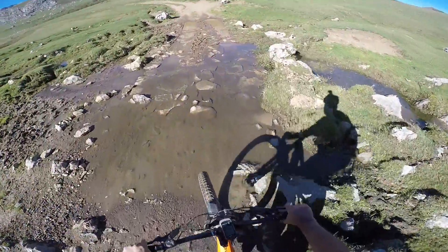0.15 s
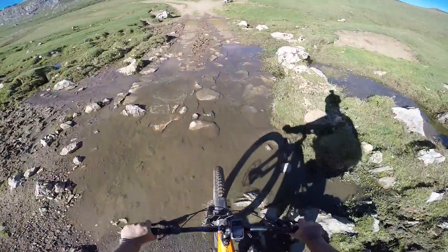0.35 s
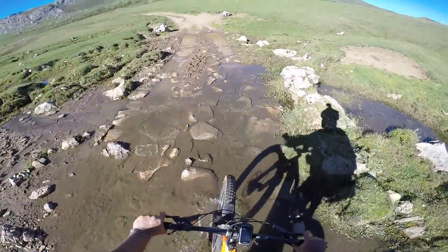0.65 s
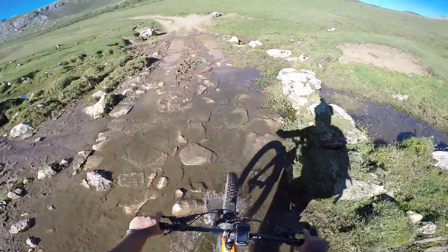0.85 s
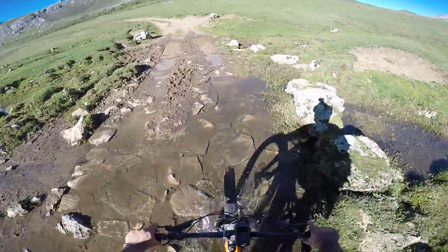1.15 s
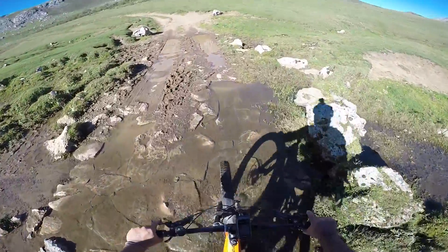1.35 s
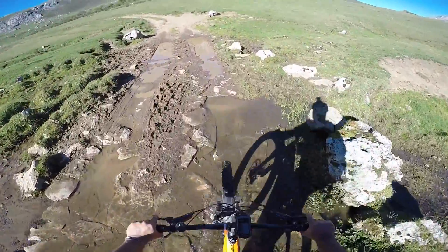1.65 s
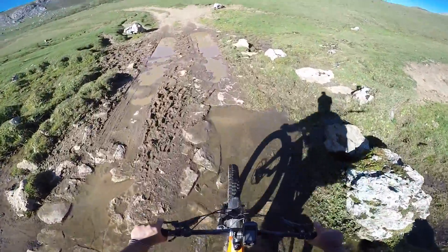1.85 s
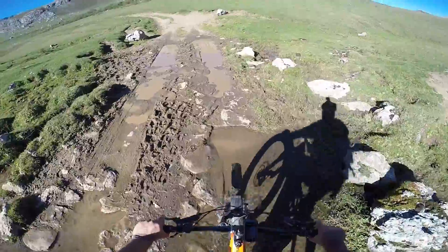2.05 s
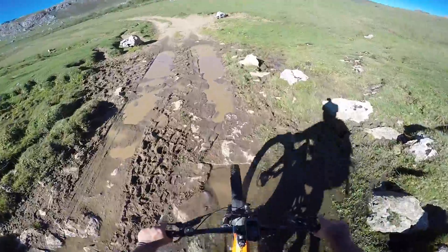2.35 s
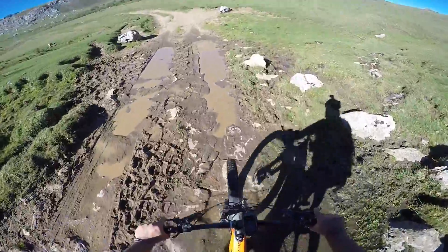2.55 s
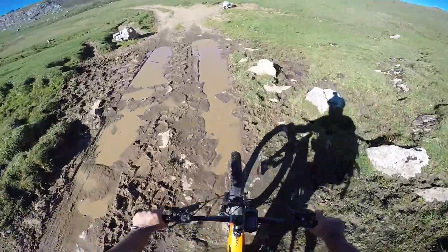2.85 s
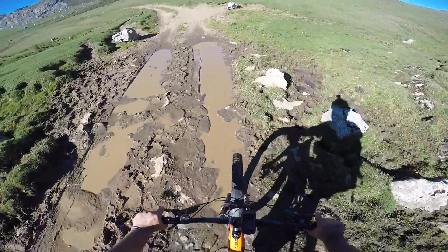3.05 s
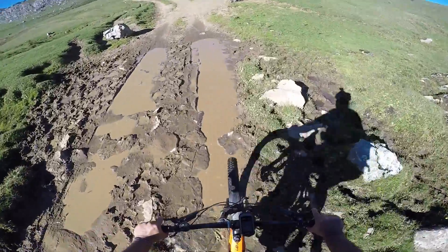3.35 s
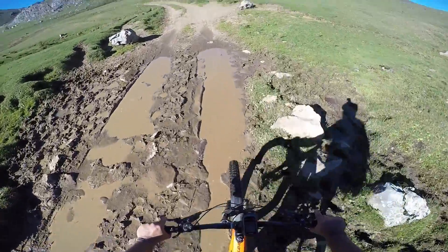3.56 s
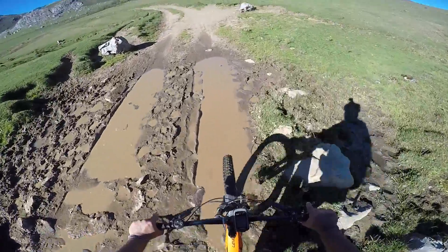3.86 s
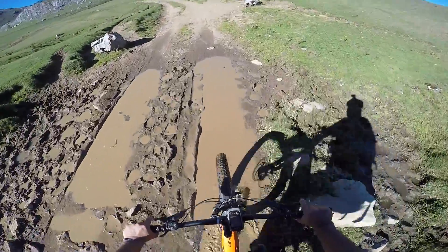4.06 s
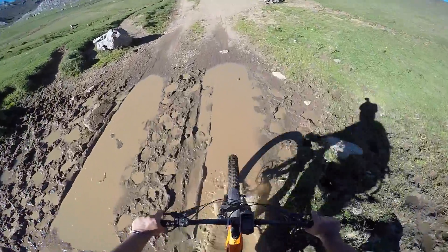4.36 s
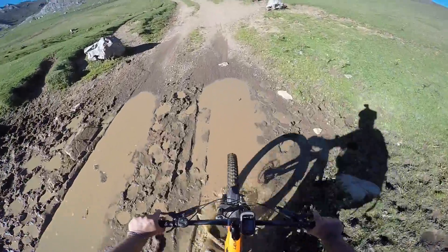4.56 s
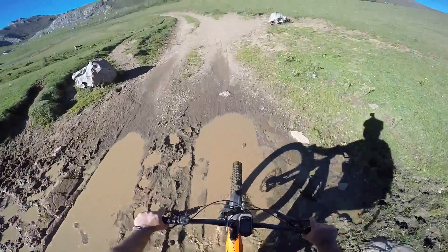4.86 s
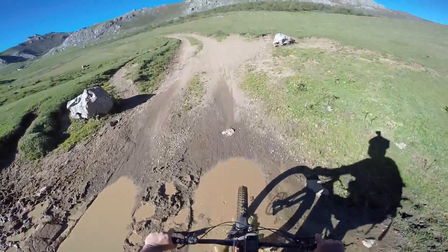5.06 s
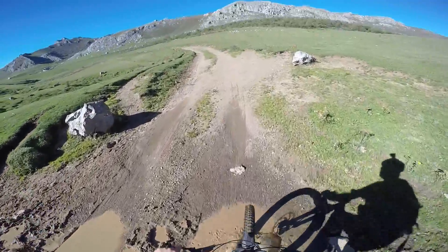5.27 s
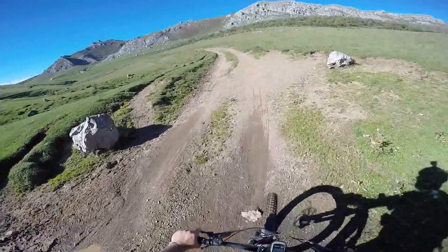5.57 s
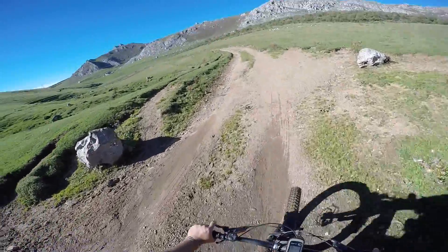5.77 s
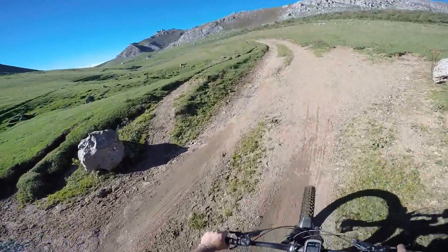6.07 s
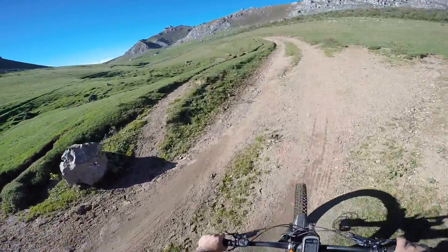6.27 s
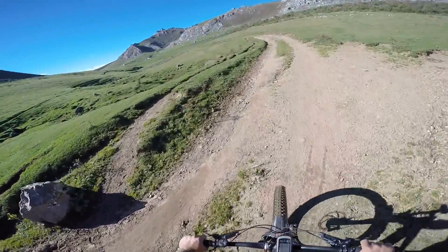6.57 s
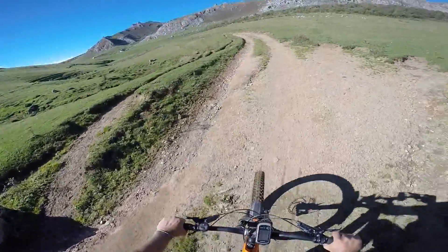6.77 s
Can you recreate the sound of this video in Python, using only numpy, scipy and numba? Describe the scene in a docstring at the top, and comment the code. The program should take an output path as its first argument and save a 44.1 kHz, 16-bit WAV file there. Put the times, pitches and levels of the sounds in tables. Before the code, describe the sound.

A bicycle rolls through puddles and mud, heard close from the rider's head through a boxy, muffled case. Watery rushing surges and flickers, dotted with short splats and a few small bubble plops. Wind thuds and flutters underneath throughout, with a brief sagging low hum midway and blunt knocks afterwards. The splashes thin out near the end, leaving breeze and faint hiss.

```python
"""On a muddy hillside track, a camera in a closed case rides on a cyclist's helmet.
Wind buffets the case: filtered noise rumbles and flutters, low damped rings knock, a brief hum sags.
Tyres throw water from puddles: noise and showers of tiny rings, splats as noise bursts, plops as tones,
with wash and splats coloured by the case's resonances. An insect's pulsed high tone chirps three times
over the microphone's steady hiss."""
import sys
import numpy as np
from scipy import signal
from scipy.fft import rfft, irfft, next_fast_len
from scipy.io import wavfile
from scipy.ndimage import uniform_filter1d
from numba import njit

SR = 44100
rng = np.random.default_rng(int(sys.argv[2]) if len(sys.argv) > 2 else 0)


def master_out(mix):
    """Clip the mix to full scale and print it as 16-bit PCM to the path in sys.argv[1]."""
    frames = np.transpose(np.atleast_2d(mix))
    ceiling = np.clip(frames, -1, 1)
    pcm = np.round(ceiling * 32767).astype(np.int16)
    wavfile.write(sys.argv[1], SR, pcm)


N = 305172

# resonances of the case that colour outside sound: centre_hz, width_hz, boost_db
CASE_RESONANCES = [(1216, 480, 13), (1925, 376, 12), (2350, 275, 9.5), (2840, 70, 7), (3352, 435, 11.5),
                   (4076, 340, 7.5), (4695, 92, 8), (6000, 140, 5), (7180, 1670, 7)]
# spectrum of outside sound at the microphone, before the resonances: frequency_hz, density_db (per Hz)
OUTSIDE_SPECTRUM = [(400, -3.5), (900, -9), (1600, -12.5), (3000, -3), (4500, -9), (5500, -14.5),
                    (8000, -15), (10000, -20.5), (15000, -21.5)]


def undb(db):
    """Amplitude factor for a level in dB."""
    return 10 ** (np.asarray(db) / 20)


def level(x, db):
    """Scales a signal to an RMS level in dB."""
    return x * undb(db) / np.sqrt(np.mean(x ** 2))


def curves(table):
    """Columns of a table joined by straight lines in time."""
    s, *columns = np.transpose(table)
    return [np.interp(np.arange(N) / SR, s, column) for column in columns]


def colour(x, spectrum, peaks=()):
    """Causal filter with the given spectrum plus resonant boosts (phase from the cepstrum)."""
    size = next_fast_len(len(x) + SR)
    hz = np.arange(size // 2 + 1) * SR / size + 1e-3
    point_hz, point_db = np.transpose(spectrum)
    db = np.interp(np.log(hz), np.log(point_hz), point_db)
    for centre, width, boost_db in peaks:
        db = db + boost_db / (1 + (2 * (hz - centre) / width) ** 2)
    # folding the cepstrum onto positive times gives minimum phase
    cepstrum = irfft(db * np.log(10) / 20, size)
    cepstrum[1:size // 2] *= 2
    cepstrum[size // 2 + 1:] = 0
    response = np.exp(rfft(cepstrum))
    return irfft(rfft(x, size) * response, size)[:N]


def band(x, lo_hz, hi_hz, order=3):
    """Butterworth band-pass."""
    return signal.sosfilt(signal.butter(order, [lo_hz, hi_hz], "band", fs=SR, output="sos"), x)


def walk(rate):
    """Random levels held 1 / rate s and slewed twice; spread near 1."""
    hold = int(SR / rate)
    steps = np.repeat(rng.standard_normal(N // hold + 1), hold)
    return 1.3 * uniform_filter1d(uniform_filter1d(steps, hold), hold)[:N]


def steady(x, hold_s, share):
    """Evens out a share of the swells that narrow noise has by itself."""
    power = uniform_filter1d(x ** 2, int(hold_s * SR))
    return level(x / power ** (share / 2), 0)


def swell(s, db, rise_s, fall_s):
    """Power of bell-shaped swells, summed; computed every 64 samples and joined by lines."""
    coarse = np.arange(0, N, 64)
    t = coarse / SR - np.array(s)[:, None]
    bell = np.exp(-(t / np.where(t < 0, rise_s, fall_s)) ** 2)
    power = undb(2 * np.array(db))[:, None] * bell
    return np.interp(np.arange(N), coarse, power.sum(axis=0))


@njit
def rings(start, hz, cycles, glide, size, n):
    """Damped sines, fading by 1/e in the given cycles; a positive glide raises the pitch, as in bubbles."""
    y = np.zeros(n)
    for g in range(len(start)):
        length = cycles[g] * SR / hz[g]
        phase = 0.
        for i in range(min(int(5 * length), n - start[g])):
            phase += 2 * np.pi * hz[g] * (1 + glide * i / length) / SR
            y[start[g] + i] += size[g] * np.exp(-i / length) * np.sin(phase)
    return y


def drops(count, lo_hz, hi_hz, cycles, glide, scatter_db):
    """A random shower of gliding rings whose sizes scatter exponentially in dB."""
    when, pitch, loudness, damping = rng.random((count, 4)).T
    start = (when * N).astype(np.int64)
    hz = lo_hz * (hi_hz / lo_hz) ** pitch
    size = undb(scatter_db * np.minimum(-np.log(1 - loudness), 3))
    return level(rings(start, hz, cycles * (.5 + damping), glide, size, N), 0)


def wind():
    """Turbulence rumbles in the case, split at 45 Hz, and flutters at its edges; buffets swell from a breeze."""
    # wind noise inside the case: frequency_hz, density_db (per Hz)
    rumble = [(3, -12), (8, -2), (16, 2), (22, -3.5), (30, -10), (40, -12), (50, -13), (60, -19.5),
              (80, -30), (100, -38), (140, -48), (250, -90)]
    # steady wind between buffets: start_s, deep_db, upper_db
    breeze = [(0, -37, -54), (.6, -32.5, -44), (1.4, -33.5, -59.5), (2.0, -35, -45.5), (2.7, -28, -52),
              (3.5, -37.5, -49.5), (3.8, -33, -46.5), (5.15, -24, -47.5), (5.4, -34, -61),
              (5.65, -29.5, -48), (6.1, -41, -54), (6.87, -31.5, -59), (6.92, -59, -59)]
    # short swells whose power adds to the breeze: peak_s, deep_db, upper_db
    buffets = [(.44, -27, -46), (.86, -24, -47), (1.25, -26.5, -40), (1.39, -27, -40.5), (1.54, -22, -45),
               (1.64, -38, -38.5), (1.84, -28.5, -65), (2.28, -29, -34), (2.63, -26, -43),
               (2.75, -43, -35.5), (3.09, -30.5, -40), (3.33, -27, -41), (3.665, -25.5, -41),
               (3.715, -19, -40), (3.775, -25.5, -41), (3.94, -22, -52), (4.18, -29, -40.5),
               (4.431, -21, -30), (4.62, -21.5, -45), (5.0, -25, -35), (5.542, -20, -33),
               (5.96, -27.5, -64), (6.24, -27.5, -62), (6.52, -33, -44), (6.84, -37, -41.5)]
    # longer swells of the flutter: peak_s, level_db, half_width_s (to 1/e of the power)
    flutters = [(0.1, -65, 0.16), (1.82, -59.5, 0.14), (3.1, -64, 0.23)]
    rise_s, fall_s = 0.023, 0.03  # upper buffets, to 1/e of the power
    deep_stretch = 1.33  # the deep rumble swells this many times slower
    flutter_floor_db = -71

    deep_calm_db, upper_calm_db = curves(breeze)
    s, deep_db, upper_db = np.transpose(buffets)
    deep_swell = swell(s, deep_db, deep_stretch * rise_s, deep_stretch * fall_s)
    deep_gain = np.sqrt(undb(2 * deep_calm_db) + deep_swell)
    upper_gain = np.sqrt(undb(2 * upper_calm_db) + swell(s, upper_db, rise_s, fall_s))

    air = colour(rng.standard_normal(N + SR), rumble)
    low_air = signal.sosfilt(signal.butter(4, 45, fs=SR, output="sos"), air)
    high_air = signal.sosfilt(signal.butter(4, 45, "high", fs=SR, output="sos"), air)
    deep = steady(low_air, hold_s=0.12, share=0.85)
    upper = steady(high_air, hold_s=0.078, share=0.65)

    flutter = undb(2.5 * walk(15.)) * band(rng.standard_normal(N), 85, 210, order=2)
    s, db, half_s = np.transpose(flutters)
    flutter_swell = swell(s, db, half_s[:, None], half_s[:, None])
    flutter_gain = np.sqrt(undb(2 * flutter_floor_db) + flutter_swell)
    return deep_gain * deep + upper_gain * upper + flutter_gain * level(flutter, 0)


def water():
    """Fizz, droplets and bubbles over rushing noise; the bands surge together and flicker alone."""
    # water thrown by the tyres: start_s, wash_db, spray_db (relative to wash), slosh_db (relative to wash)
    thrown = [(0, -62.5, -1, -2), (.3, -61, 1, -7), (.48, -55, 1.5, -11), (.56, -65, 5, 1.5),
              (.62, -53, 2.5, -12), (.72, -52.5, -3, -12.5), (.84, -54.5, 3.5, -7.5), (1.15, -53, 3, -6.5),
              (1.62, -50.5, -0.5, -7), (1.72, -55.5, -1.5, -7.5), (2.12, -54.5, 1.5, -6.5),
              (2.24, -56.5, 1, -11), (2.72, -55, 0, -5), (2.85, -63.5, -2, 2), (3.12, -58.5, 0.5, -2.5),
              (3.45, -63, 0, -7.5), (3.62, -60.5, 4.5, -9), (3.71, -63, 1.5, -8), (3.8, -58.5, 3.5, -9.5),
              (4.3, -53.5, 1.5, -10.5), (4.7, -52, 2, -8.5), (4.97, -53.5, 0.5, -6.5),
              (5.25, -49.5, -1.5, -12.5), (5.6, -52, -2, -8.5), (6.0, -54, -4.5, -9.5),
              (6.35, -66, -1.5, -9.5), (6.92, -73.5, -0.5, -1)]
    wash_db, spray_db, slosh_db = curves(thrown)
    # fine mist, relative to the wash: follows the spray and lags behind a louder wash
    mist_db = -13 + 1.3 * spray_db - 0.18 * (wash_db + 56)

    fizz = drops(count=7000, lo_hz=886.0, hi_hz=12800.0, cycles=0.85, glide=0.1, scatter_db=-3.5)
    droplets = drops(count=2500, lo_hz=1488.0, hi_hz=7520.0, cycles=3.16, glide=0.046, scatter_db=2.0)
    bubbles = drops(count=900, lo_hz=1700., hi_hz=6000., cycles=10., glide=0.02, scatter_db=2.)
    # low rings last longer, so the treble of the showers is lifted to even them out
    shower = level(np.diff(fizz + undb(-1.) * droplets, prepend=0), -2.5)
    rush = rng.standard_normal(N)
    heard = colour(rush + shower + undb(-12.) * bubbles, OUTSIDE_SPECTRUM, CASE_RESONANCES)

    # shared surge and separate flicker, both in dB
    surge = .5 * walk(40.) + 1.0 * walk(80.)
    wash = undb(surge + 0.5 * walk(30.)) * band(heard, 1600, 3227)
    slosh = undb(1.76 * surge + 0.51 * walk(30.)) * band(heard, 517, 1547)
    spray = undb(surge + 1.0 * walk(30.)) * band(heard, 2900, 5000)
    mist = undb(.9 * surge + 1.6 * walk(30.)) * band(heard, 5300, 14500)
    mix = level(wash, 0)
    mix = mix + undb(slosh_db) * level(slosh, 0)
    mix = mix + undb(spray_db) * level(spray, 0)
    mix = mix + undb(mist_db) * level(mist, 0)
    return undb(wash_db) * mix


def hiss():
    """The microphone's own noise: steady, shaped noise with narrow raised bands."""
    # noise floor: frequency_hz, density_db (per Hz, relative)
    hiss_spectrum = [(90, -4.5), (250, -11.5), (350, -15), (600, -17.5), (1300, -20), (1600, -22.5),
                     (2000, -16), (7500, -32), (9400, -31.5), (13500, -36), (15200, -41)]
    # raised bands in the noise floor: centre_hz, width_hz, boost_db
    hiss_bands = [(250, 60, 4), (9500, 200, 9.5), (14300, 300, 6)]
    return level(colour(rng.standard_normal(N), hiss_spectrum, hiss_bands), -59.5)


def insect():
    """Each chirp is three fading bell-shaped pulses on one high pitch."""
    # chirps: first_pulse_s, peak_db, pitch_hz
    chirps = [(0.036, -52.5, 9040), (.225, -53.5, 9080), (.407, -59, 9040)]
    spacing_s, half_s = 0.0089, 0.0033
    t, out = np.arange(N) / SR, 0
    for s, db, hz in chirps:
        pulses = 0
        for k in range(3):
            pulses = pulses + undb(-1.8 * k * k) * np.exp(-((t - s - spacing_s * k) / half_s) ** 2)
        out = out + undb(db) * pulses * np.sin(2 * np.pi * hz * t)
    return out


def splats():
    """Mud and water strike as noise bursts in the case's colour, each in its own band and opened by a tick."""
    # single splats: peak_s, level_db (RMS with the envelope's own RMS divided out), lo_hz, hi_hz, t60_s
    splat_table = [(0.410, -50, 2820, 3840, 0.11), (0.677, -50, 2370, 4260, 0.086),
                   (0.945, -46, 1600, 2640, 0.06), (1.043, -45.5, 1820, 2320, 0.22),
                   (1.056, -46.5, 2800, 4400, 0.17), (1.38, -50, 2780, 4320, 0.16),
                   (1.46, -51, 1000, 1450, 0.065), (1.593, -50, 2700, 8040, 0.11),
                   (2.027, -49.5, 2660, 8000, 0.17), (2.155, -46, 1630, 4500, 0.08),
                   (2.384, -48, 1800, 13000, 0.026), (2.545, -51, 1650, 4630, 0.27),
                   (2.696, -48.5, 1030, 2420, 0.07), (2.713, -42, 1120, 3100, 0.031),
                   (2.765, -54, 1500, 8500, 0.039), (3.088, -50, 1500, 2620, 0.032),
                   (3.196, -52, 3000, 13000, 0.029), (3.205, -49, 3220, 7900, 0.15),
                   (3.314, -50.5, 3400, 4200, 0.038), (3.343, -57, 3000, 9500, 0.047),
                   (3.365, -48.5, 3140, 4000, 0.031), (3.479, -46.5, 3050, 14000, 0.011),
                   (3.519, -55, 2870, 8000, 0.12), (3.6, -48.5, 1000, 5000, 0.11),
                   (3.621, -60, 2600, 4500, 0.049), (3.655, -50.5, 1560, 2290, 0.068),
                   (3.851, -56, 4620, 14000, 0.14), (3.873, -46.5, 2900, 6000, 0.063),
                   (4.098, -48, 2680, 7840, 0.15), (4.144, -45.5, 1050, 2680, 0.11),
                   (4.288, -46.5, 1800, 8500, 0.11), (4.314, -49.5, 950, 1540, 0.083),
                   (4.419, -44.5, 1140, 6030, 0.22), (4.446, -45.5, 647, 1450, 0.056),
                   (4.555, -53, 980, 1520, 0.1), (4.625, -53.5, 890, 1450, .25),
                   (4.891, -42.5, 1600, 2700, 0.019), (4.925, -44.5, 2600, 9800, 0.11),
                   (5.078, -47, 3000, 3700, 0.037), (5.107, -44, 1430, 4000, 0.13),
                   (5.183, -43, 1890, 2480, 0.063), (5.236, -45.5, 3000, 3600, .05),
                   (5.832, -49, 2440, 2900, 0.1), (5.84, -54, 960, 1400, 0.13),
                   (6.185, -55, 3380, 5000, 0.064), (6.252, -50.5, 1390, 2580, 0.061)]
    rise_share = 0.1  # rise as a share of the decay: short ones are sharp, long ones softer
    tick_s = .0032  # the tick grows as this time over the decay
    out, t = np.zeros(N + SR), np.arange(SR // 4) / SR
    noise = colour(rng.standard_normal(N), OUTSIDE_SPECTRUM, CASE_RESONANCES)
    impulse = 1. * (np.arange(N) == 0)
    tick = colour(impulse, OUTSIDE_SPECTRUM, CASE_RESONANCES)[:len(t)]
    tick = level(tick, 0) * np.std(noise)
    for s, db, lo_hz, hi_hz, t60 in splat_table:
        rise_s = max(rise_share * t60, .0005)
        at = int((s - rise_s) * SR)
        decay = 1000 ** (-(t - rise_s) / max(t60, .01))
        shape = np.minimum(t / rise_s, decay)
        late_tick = np.roll(tick, int(rise_s * SR))  # lands at the peak
        source = noise[at:at + len(t)] + tick_s / t60 * late_tick
        burst = shape * band(source, lo_hz, hi_hz, order=2)
        out[at:at + len(t)] += level(burst, db) * np.sqrt(np.mean(shape ** 2))
    return out[:N]


def plops():
    """Lone bubbles in the puddles: short clear tones that swell and fade, rising a little."""
    # plops: peak_s, peak_db, pitch_hz (at the peak)
    plop_table = [(1.348, -47, 924), (5.968, -56, 860), (6.79, -60.5, 1600)]
    half_s, glide_per_s = .0075, 3.
    s, db, hz = np.transpose(plop_table)[:, :, None]
    u = np.arange(N) / SR - s
    tone = np.sin(2 * np.pi * hz * u * (1 + glide_per_s * u / 2))
    return (undb(db) * np.exp(-(u / half_s) ** 2) * tone).sum(axis=0)


def knocks():
    """Each blunt push of a bump or gust rings the heavily damped modes of case and mount."""
    # pushes on the case: start_s, level_db (before the modes' own levels)
    thumps = [(2.741, -49.5), (3.571, -49.5), (3.617, -49), (4.143, -43.5), (4.187, -40.5), (4.374, -38.5),
              (4.51, -43), (4.545, -52), (4.569, -52), (4.615, -45), (4.747, -42.5), (4.817, -49.5),
              (4.918, -45), (4.968, -51), (5.497, -48), (6.501, -50)]
    # modes that a knock rings: pitch_hz, level_db (added to the push), decay_cycles (to 1/e)
    modes = [(125, -5, 1.), (183, -1.5, 1.8), (245, -2.5, 2.6), (430, -8.5, 2.4), (720, -9, 1.8),
             (1300, -10, 1.5)]
    s, db = np.transpose(thumps)
    start = (s * SR).astype(np.int64)
    out = 0
    for hz, mode_db, cycles in modes:
        pitches, lengths = np.full(len(s), hz), np.full(len(s), cycles)
        out = out + rings(start, pitches.astype(float), lengths, 0., undb(db + mode_db), N)
    return out


def hum():
    """A low hum that sags for a moment in the wind: a falling tone under a half-sine swell."""
    start_s, length_s, peak_db, from_hz, to_hz = 3.24, 0.257, -36.5, 78, 62
    u = np.clip((np.arange(N) / SR - start_s) / length_s, 0, 1)
    phase = 2 * np.pi * np.cumsum(from_hz + (to_hz - from_hz) * u) / SR
    return undb(peak_db) * np.sin(np.pi * u) * np.sin(phase)


def scene():
    """Wind, water and insect together at one microphone."""
    noise_floor = hiss()
    wind_on_case = wind() + hum() + knocks()
    puddles = water() + splats() + plops()
    return (wind_on_case + puddles + insect() + noise_floor)[None]


def record(dry):
    """The camera cuts the top with a steep elliptic low-pass at 15180 Hz."""
    return signal.sosfilt(signal.ellip(10, .2, 60, 15180, fs=SR, output="sos"), dry)


dry = scene()
out = record(dry)
master_out(out)
```